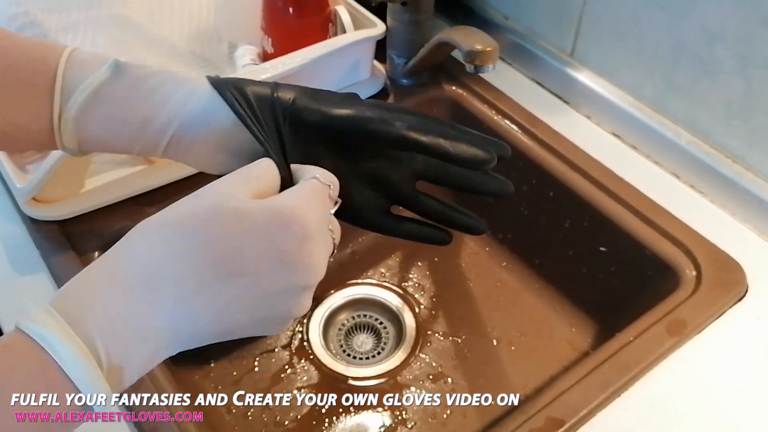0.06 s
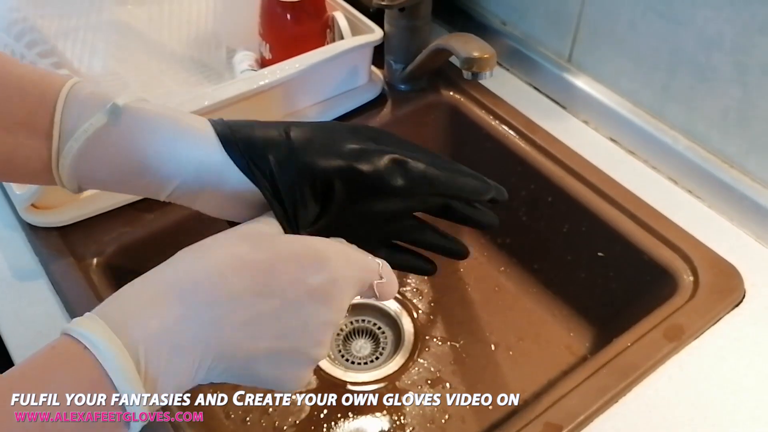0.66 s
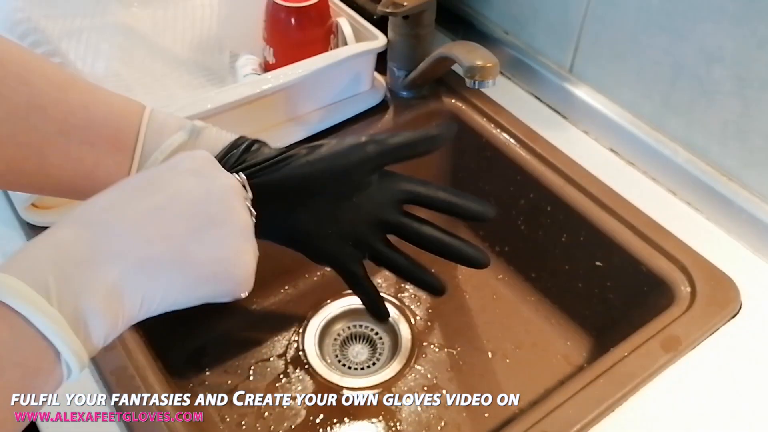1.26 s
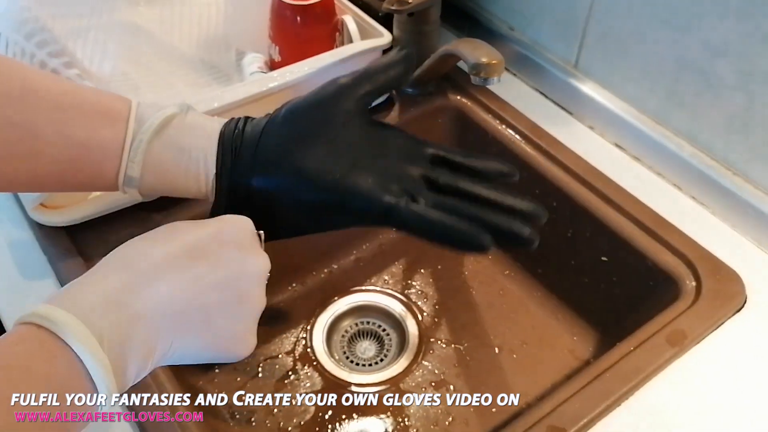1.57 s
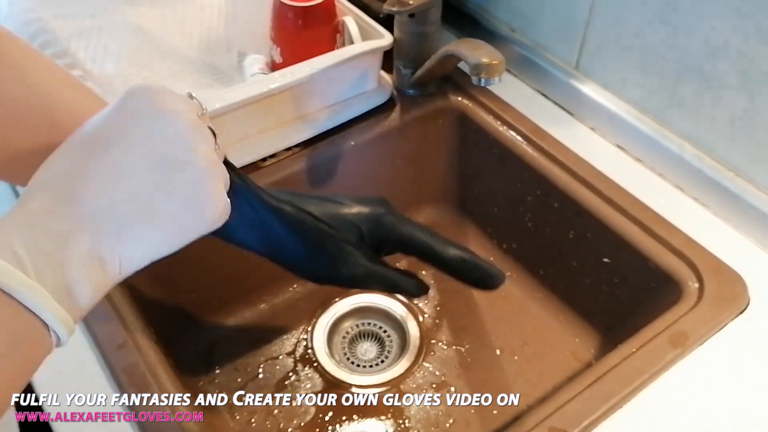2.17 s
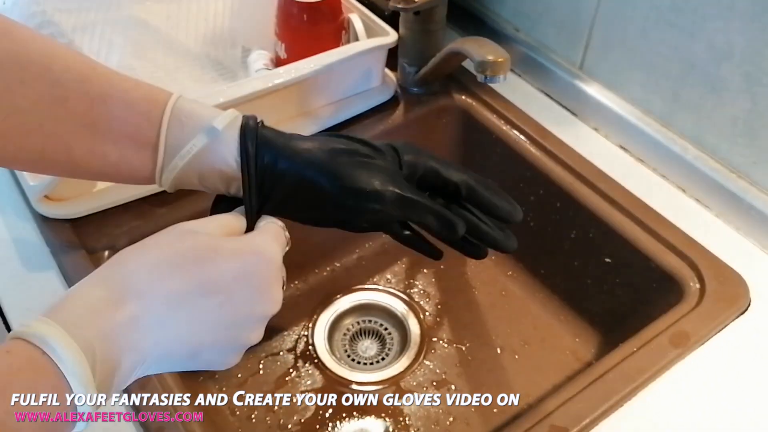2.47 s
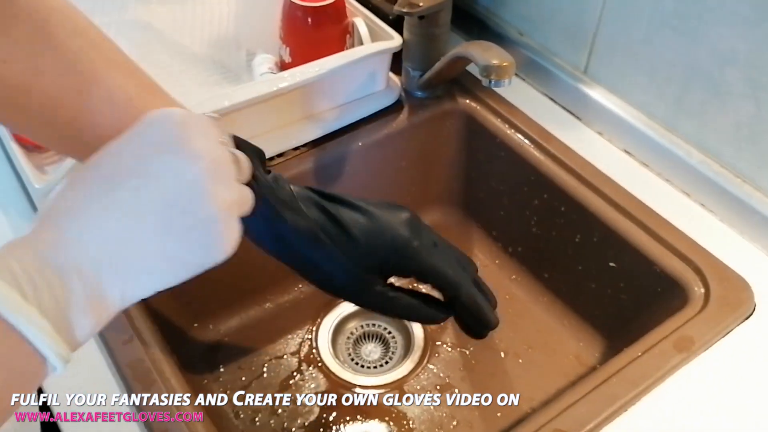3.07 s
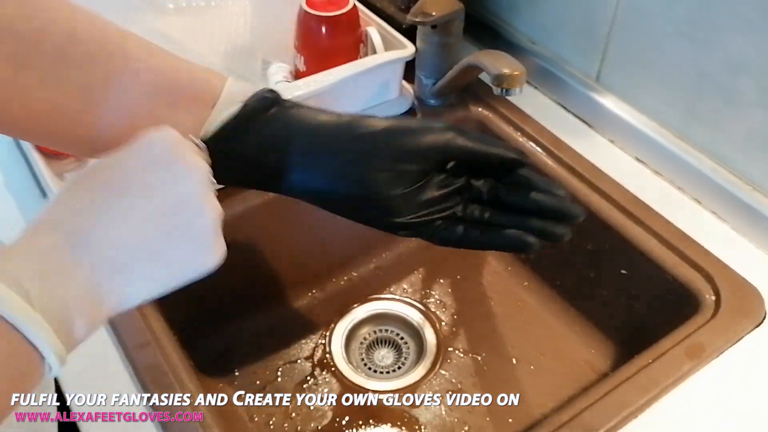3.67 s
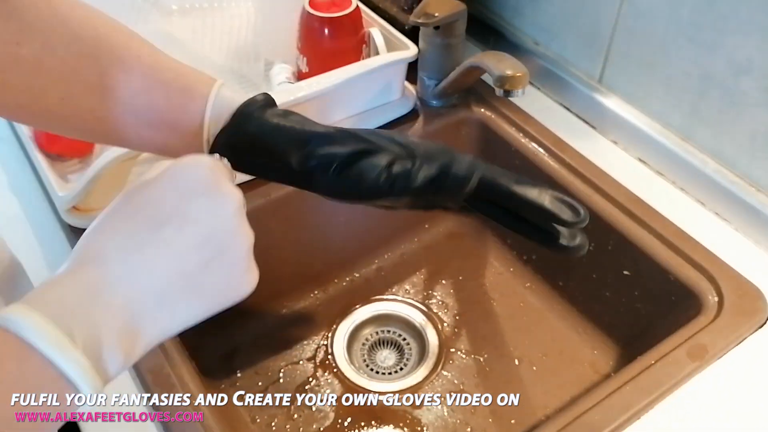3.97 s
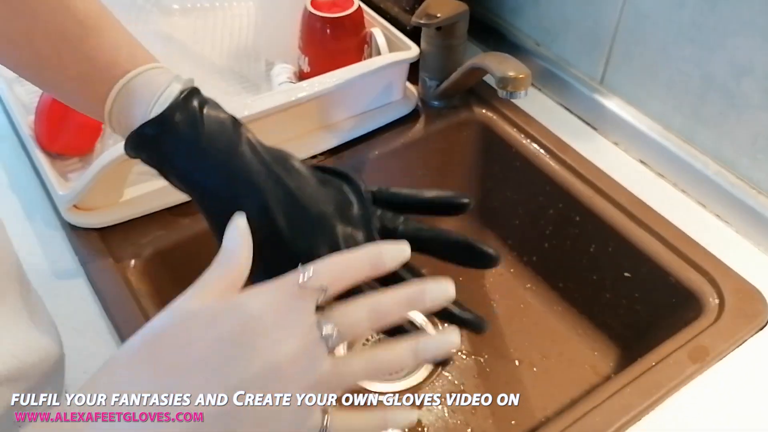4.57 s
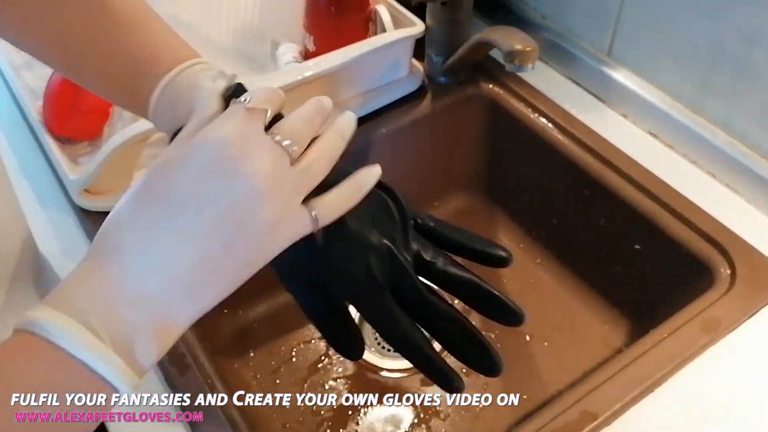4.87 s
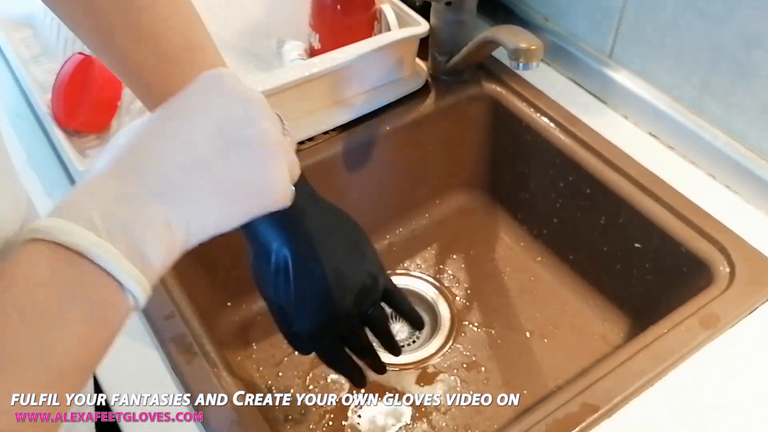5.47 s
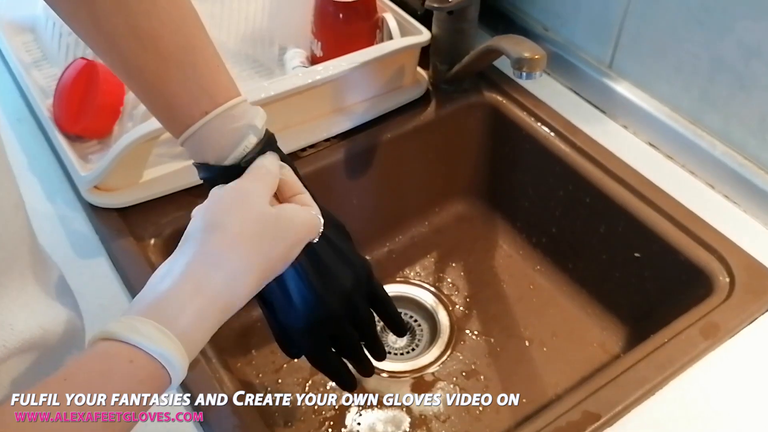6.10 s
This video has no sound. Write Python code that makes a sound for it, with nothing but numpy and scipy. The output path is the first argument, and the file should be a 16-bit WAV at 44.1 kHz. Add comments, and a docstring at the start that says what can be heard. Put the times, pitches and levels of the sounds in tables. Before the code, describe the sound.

A fan hums steadily with a soft rush of air in a kitchen for the whole six seconds or so. Close by, a latex glove is tugged on over another glove. At about 0.3 seconds the cuff gives a quick cluster of sharp snaps with small pops, followed by sticky crackles. More snaps come around 0.9 to 1.1 seconds, with a short fizzy rub of rubber and peeling creases. The loudest snap lands at about 1.8 seconds, with two smaller pops by 2 seconds. Faint rubbing and scattered soft crackles follow, then a light snap at 3.4 seconds and a sharper one at 4 seconds. After that it is mostly the fan, with a faint crackle near 4.9 seconds and a few more leading to a small snap at 6.2 seconds. Each snap rings briefly off the sink and tiled walls.

```python
"""Sharp snaps of a latex glove, tugged into place over a kitchen sink.
The cuff slaps the wrist and pops small air pockets; sticky creases peel, latex rubs on latex.
The basin and tiled walls answer, and a fan drones behind.
Automatic gain control ducks after the loudest snaps."""
import sys
import numpy as np
from scipy import signal
from scipy.fft import rfft, irfft, next_fast_len
from scipy.io import wavfile
from scipy.ndimage import uniform_filter1d

SR = 44100
rng = np.random.default_rng(int(sys.argv[2]) if len(sys.argv) > 2 else 0)


def store_pcm(level_fs):
    """Save levels as 16-bit WAV."""
    pcm = np.round(np.clip(level_fs, -1, 1) * 32767).astype(np.int16)
    wavfile.write(sys.argv[1], SR, np.atleast_2d(pcm).T)


N = 279594
TIME_S = np.arange(N) / SR


def snaps(crack_trim_db=5, pop_trim_db=-1, pop_pan_db=-3, rebound_crack_db=-6, thud_trim_db=-16):
    """Cuff hits wrist: crack, pop, faint thud; it rebounds onto a second air pocket."""
    # cuff hits: start_s, crack_db, treble_db, pocket_hz, pop_db, decay_ms, pan_db,
    # rebound_ms, rebound_db, rebound_hz
    hits = [(0.2829, -44, -1, 2360, -50, 2.7, 3, 4, -17, 3900),
            (0.2936, -38, -2.5, 4540, -34.5, 3.1, -10, 2.6, -12, 2800),
            (0.3357, -48.5, -4, 5240, -39.5, 1.6, -8, 4, -14, 3000),
            (0.9188, -38.5, -18, 2370, -34.5, 3.9, -5.5, 5.3, -4, 2730),
            (1.0161, -49, -10, 2260, -39, 3.3, -8, 4.9, 0, 2660),
            (1.0457, -43.5, 1, 1880, -55, 0.5, -4, 3, -10, 2600),
            (1.5952, -73, -20, 2370, -45, 4, -5, 7.1, -8, 2720),
            (1.758, -31.5, -10.5, 1540, -22.5, 1.5, -7, 1.77, -11, 3910),
            (1.867, -50, -24, 1990, -37, 2.5, -6, 8.5, -1.5, 2200),
            (1.9622, -46.5, -2, 1620, -33.5, 5.5, -16, 3.5, -10, 1760),
            (3.4374, -53, -10.5, 2000, -49, 4.2, -11, 4.3, -14, 3000),
            (3.9798, -41, -0.5, 1320, -45, 2.6, -9.5, 2.65, -2.5, 3600),
            (6.204, -56, -7, 3800, -51, 2.3, -9, 2.4, 3, 2480)]
    out = np.zeros((2, N))
    for start_s, db, treble_db, hz, pop_db, decay_ms, pan_db, rebound_ms, rebound_db, rebound_hz in hits:
        add(out, start_s, panned(thud(db + thud_trim_db), 0))
        first = (start_s, db, hz, pop_db)
        rebound_s = start_s + rebound_ms / 1000
        rebound = (rebound_s, db + rebound_db + rebound_crack_db, rebound_hz, pop_db + rebound_db)
        for at_s, slap_db, air_hz, air_db in (first, rebound):
            add(out, at_s, panned(crack(slap_db + crack_trim_db, treble_db, air_hz, decay_ms), pan_db))
            add(out, at_s, panned(pop(air_hz, air_db + pop_trim_db), pan_db + pop_pan_db))
    return out


def crack(db, treble_db, fold_hz, decay_ms, rise_ms=1.0, grain_db=4):
    """Rubber meets or leaves skin patch by patch: a dying rush of tiny uneven impacts."""
    t_ms = np.arange(SR // 20) * 1000 / SR
    impacts, sizes = rng.standard_normal((2, len(t_ms)))
    envelope = (1 - np.exp(-t_ms / rise_ms)) * np.exp(-t_ms / decay_ms)
    rush = impacts * gain_of(grain_db * np.clip(sizes, -2, 2)) * envelope
    return latex_colour(at_level(rush, db), treble_db, fold_hz)


def pop(pitch_hz, db, swell_power=3):
    """Trapped air rings for a few cycles, swelling as the rubber closes over it."""
    # air pocket modes: pitch_ratio, gain_db, decay_cycles
    modes = [(0.989, 3, 1.38), (1.237, -12.5, 0.76), (1.63, -15.5, 1.1), (4, -23, 1.1), (0.24, -31, 2.1)]
    cycles = pitch_hz * np.arange(SR // 50) / SR
    ring = np.zeros(len(cycles))
    for ratio, gain_db, decay_cycles in modes:
        age = cycles / decay_cycles
        ring += gain_of(gain_db) * age ** swell_power * np.exp(-age) * np.sin(2 * np.pi * ratio * cycles)
    return at_level(ring, db)


def thud(db, pitch_hz=240, decay_s=0.0045):
    """The flesh of the wrist takes the blow: a low, dead bump."""
    t = np.arange(SR // 12) / SR
    return at_level(np.sin(2 * np.pi * pitch_hz * t) * t * np.exp(-t / decay_s), db)


def creases(trim_db=3, decay_ms=4.1):
    """Sticky folds peel apart: a soft crack, no pop."""
    # crease releases: start_s, level_db, treble_db, fold_hz, pan_db
    peels = [(0.0902, -67, -7, 6000, -27), (.2667, -62, -7, 4000, 1), (0.5233, -42, -17.5, 5700, -7),
             (.6275, -53.5, -4, 4000, -5), (.6578, -47.5, -7, 4500, 10), (.6627, -43.5, -4, 1510, -14),
             (1.092, -51.5, -7, 3500, -11), (1.1413, -39.5, -7, 2270, -7.5),
             (1.191, -52.5, -1.5, 3000, -10), (1.3733, -66.5, -4, 5000, -3), (1.4946, -59, -10, 4000, -5),
             (1.522, -68, -1, 6000, -10), (1.5449, -62, -12, 3980, -10), (1.637, -62.5, -16, 3000, -18),
             (1.946, -58, -13, 4000, -6), (2.0018, -48.5, -7, 1800, -20), (2.1065, -63, 1, 7000, -5),
             (2.137, -64, -7, 5000, -6), (2.2826, -62.5, 4, 11000, -15), (2.5456, -66, -14, 4000, -7),
             (2.5998, -71.5, -1.5, 7000, 1), (2.797, -60, -15, 4500, -7), (2.906, -59, -17, 4500, -9),
             (3.1587, -53, -13, 4000, -3), (3.5856, -52.5, -7, 6000, -6.5), (3.7872, -50, -9, 2870, -6.5),
             (3.8288, -56, -8, 5000, -11), (4.884, -56, -6, 10000, -20), (5.8738, -66, -8, 6000, -20),
             (5.955, -74, -1, 6000, -5), (6.13, -62.5, -13, 6000, -3), (6.1625, -59, -12, 4600, -2),
             (6.179, -52.5, -11, 3720, -22)]
    out = np.zeros((2, N))
    for start_s, db, treble_db, fold_hz, pan_db in peels:
        add(out, start_s, panned(crack(db + trim_db, treble_db, fold_hz, decay_ms), pan_db))
    return out


def rubbing(trim_db=-1.5, slips_per_s=1100, spread_db=2.0, catches_per_s=12, catch_db=11, catch_ms=4):
    """Latex slips over latex in faint ticks, louder wherever it catches."""
    # hand strokes: start_s, length_s, level_db
    strokes = [(0, 0.24, -78), (0.904, 0.21, -53), (1.34, 0.68, -68), (1.782, 0.43, -62),
               (2.36, 0.27, -67.5), (2.743, 0.37, -71), (3.37, 0.76, -70), (4.82, .14, -66),
               (5.6, 0.43, -76), (6.12, .14, -68)]
    attack_s, release_s = 0.02, 0.095
    slips = (rng.random(N) < slips_per_s / SR) * rng.choice([-1, 1], N)
    slips = slips * gain_of(spread_db * np.minimum(rng.exponential(1, N), 4))
    pole = np.exp(-1000 / (catch_ms * SR))
    catches = signal.lfilter([1], [1, -pole], 1.0 * (rng.random(N) < catches_per_s / SR))
    ticks = slips * (1 + gain_of(catch_db) * catches)
    fizz = unit_rms(latex_colour(ticks, treble_db=-6, fold_hz=3200))
    drag = np.zeros(N)
    for start_s, length_s, db in strokes:
        attack = np.clip((TIME_S - start_s) / attack_s, 0, 1)
        release = np.clip((start_s + length_s - TIME_S) / release_s, 0, 1)
        drag += gain_of(db + trim_db) * attack * release
    return panned(fizz * drag, pan_db=-3)


def latex_colour(x, treble_db, fold_hz, lift_db=5, width_oct=0.89):
    """Rubber's colour: lifted at the fold's pitch, brighter where stretched thin."""
    # latex slap spectrum: freq_hz, gain_db
    spectrum = [(100, -22.5), (300, -4), (700, -22), (1300, 3.5), (2500, 5), (3700, 5), (5000, 3),
                (6500, -1.5), (8500, -5), (10800, 3), (12500, -8.5), (15000, -25.5)]
    size = x.shape[-1]
    padded = next_fast_len(size + 512)
    hz = np.fft.rfftfreq(padded, 1 / SR)
    shelf_db = treble_db * log_interp([(4000, 0.0077), (6500, 0.48), (10000, 1)], hz)
    fold_db = lift_db * np.exp(-(np.log2((hz + 1) / fold_hz) / width_oct) ** 2)
    response = gain_of(log_interp(spectrum, hz) + shelf_db + fold_db)
    return irfft(rfft(x, padded) * response, padded)[..., :size]


def glove(rub):
    """Glove sound in one direction; each crack's fine detail differs by direction."""
    return snaps() + creases() + rub


def kitchen(rub, basin_db=-5, basin_t60_s=0.058, room_db=-8.5, sink_hz=1580, sink_q=16, sink_db=-7):
    """Direct glove sound, then the basin, then tiled walls with one ringing sink mode."""
    # room decay: freq_hz, t60_s
    room = [(200, 0.62), (1500, 0.48), (4000, 0.33), (8000, 0.46), (14000, 0.18)]
    wall_paths = 3
    left, right = glove(rub)
    direct = np.array([left, np.roll(right, 6)])  # reaches the left first
    basin = reflections(glove(rub), delay_s=0.002, t60_s_at=lambda hz: np.full(len(hz), basin_t60_s))
    walls = np.zeros((2, N))
    for _ in range(wall_paths):
        mono = glove(rub).mean(0)[None]
        walls += reflections(mono, delay_s=0.0074, t60_s_at=lambda hz: log_interp(room, hz))
    walls /= np.sqrt(wall_paths)
    ring = signal.lfilter(*signal.iirpeak(sink_hz, sink_q, SR), walls)
    reverb = panned(walls + gain_of(sink_db) * ring, pan_db=-1.5)
    return direct + gain_of(basin_db) * basin + gain_of(room_db) * reverb


def reflections(x, delay_s, t60_s_at):
    """Dense stereo echoes of x, with a decay time per band."""
    hz, t, bands = signal.stft(rng.choice([-1., 1.], (2, SR * 2 // 3)), SR, nperseg=64)
    tail = signal.istft(bands * gain_of(-60 * t / t60_s_at(hz)[:, None]), SR, nperseg=64)[1]
    tail /= np.linalg.norm(tail, axis=1, keepdims=True)
    response = np.pad(tail, ((0, 0), (round(delay_s * SR), 0)))
    return signal.oaconvolve(x, response, axes=1)[:, :N]


def fan_air(trim_db=-1.02, pan_db=-1.35):
    """Rushing air, lifted by the resonances it passes."""
    # air noise: freq_hz, density_db
    air = [(25, -88), (70, -90), (120, -88), (240, -86), (360, -84.5), (580, -82.5), (950, -72),
           (1300, -84.5), (2200, -90.5), (3000, -105), (4500, -111), (7500, -122.5), (11300, -124.5),
           (13000, -146)]
    # housing and room resonances: centre_hz, width_hz, lift_db
    resonances = [(193, 43.3, 10), (302.5, 61, 9), (383, 20.6, 7), (423.2, 45.3, 13), (501.7, 40, 8.5),
                  (764.3, 132, 8), (859.5, 35, 7.5), (1110, 92, 4.5), (1505, 44, 7)]
    # left-right likeness of the noise: freq_hz, correlation
    likeness = [(50, 0.94), (200, 0.99), (400, 0.88), (800, 0.32), (1500, 0), (4000, 0.14), (12000, 0.099)]
    size = next_fast_len(N, True)
    hz = np.fft.rfftfreq(size, 1 / SR)
    peaks_db = sum(lift_db * np.exp(-2 * ((hz - centre_hz) / width_hz) ** 2)
                   for centre_hz, width_hz, lift_db in resonances)
    shape = gain_of(log_interp(air, hz) + peaks_db + trim_db) * np.sqrt(SR) / 2
    correlation = np.clip(log_interp(likeness, hz), -1, 1)
    mid, side = rfft(rng.standard_normal((2, size))) * np.sqrt([1 + correlation, 1 - correlation]) * shape
    return panned(irfft([mid + side, mid - side], size)[:, :N], pan_db)


def fan_hum(trim_db=-0.22, waver_rad_at_500hz=0.48, flutter_db_at_500hz=2.0):
    """Shaft and blade tones; the higher ones waver more."""
    # fan tones: pitch_hz, level_db, pan_db
    tones = [(18.4, -65.5, 0), (35.6, -68.5, -11), (55, -61.5, 0), (92.6, -72.5, -5), (101.1, -73.5, -14),
             (150.5, -65, -7), (198.7, -66, 4), (287.4, -63.5, 6), (389.7, -67, -1), (412.2, -54.5, 8),
             (436, -60, 1.5), (482.8, -63.5, 1), (508.6, -62, -15.5), (521.6, -68, -9), (781, -61, 3),
             (835, -58.5, -0.5), (905.5, -59, -17), (1002, -64, 4), (1030, -60, -18.5)]
    out = np.zeros((2, N))
    for hz, db, pan_db in tones:
        unsteady = np.sqrt(hz / 500)
        phase = 2 * np.pi * (hz * TIME_S + rng.random()) + unsteady * waver_rad_at_500hz * drift(9)
        level_db = db + trim_db + unsteady * flutter_db_at_500hz * drift(8)
        out += panned(np.sqrt(2) * np.sin(phase) * gain_of(level_db), pan_db)
    return out


def gain_of(db):
    return np.exp(np.asarray(db) * np.log(10) / 20)


def unit_rms(x):
    return x / np.sqrt(np.mean(x ** 2) + 1e-20)


def at_level(x, db):
    """Scales a burst to the energy of 12 ms at this rms level."""
    return x * gain_of(db) * np.sqrt(0.012 * SR / (np.sum(x ** 2) + 1e-20))


def log_interp(points, hz):
    """Reads a curve on a log-frequency axis."""
    knots_hz, values = np.transpose(points)
    return np.interp(np.log(hz + 1), np.log(knots_hz), values)


def drift(rate_hz):
    """Slow random wander, rms 1."""
    knots_s = np.arange(0, N / SR + 1, 1 / rate_hz)
    return unit_rms(np.interp(TIME_S, knots_s, rng.standard_normal(len(knots_s))))


def panned(x, pan_db):
    """Constant-power pan; pan_db is left minus right."""
    return x * unit_rms(gain_of([[pan_db / 2], [-pan_db / 2]]))


def add(mix, start_s, sound):
    part = mix[:, max(round(start_s * SR), 0):][:, :sound.shape[1]]
    part += sound[:, :part.shape[1]]


def scene():
    """The glove in the kitchen, over the fan."""
    # slow rise and fall of the background level: time_s, gain_db
    background_db = [(0, -0.1), (1.5, 2), (2.1, 0.5), (3.6, 0), (4.3, -.8), (6.3, -0.2)]
    fan_gain = gain_of(np.interp(TIME_S, *np.transpose(background_db)))
    return kitchen(rubbing()) + (fan_air() + fan_hum()) * fan_gain


def record(dry, threshold_db=-39, duck_db_per_db=0.21, peak_fall_db_per_s=48, lag_s=0.0097, trim_db=-1.0):
    """Gain control dips just after a loud snap and creeps back; then a low-pass."""
    cutoff_hz = 15200
    power_db = 10 * np.log10(abs(uniform_filter1d((dry ** 2).mean(0), size=160)) + 1e-12)
    fall_db = TIME_S * peak_fall_db_per_s
    peak_db = np.maximum.accumulate(power_db + fall_db) - fall_db
    over_db = np.maximum(peak_db - threshold_db, 0)
    pole = np.exp(-1 / (lag_s * SR))
    duck_db = duck_db_per_db * signal.lfilter([1 - pole], [1, -pole], over_db)
    lowpass = signal.firwin(511, cutoff_hz, window=("kaiser", 9), fs=SR)
    return signal.oaconvolve(dry * gain_of(trim_db - duck_db), lowpass[None], "same")


dry = scene()
out = record(dry)
store_pcm(out)
```